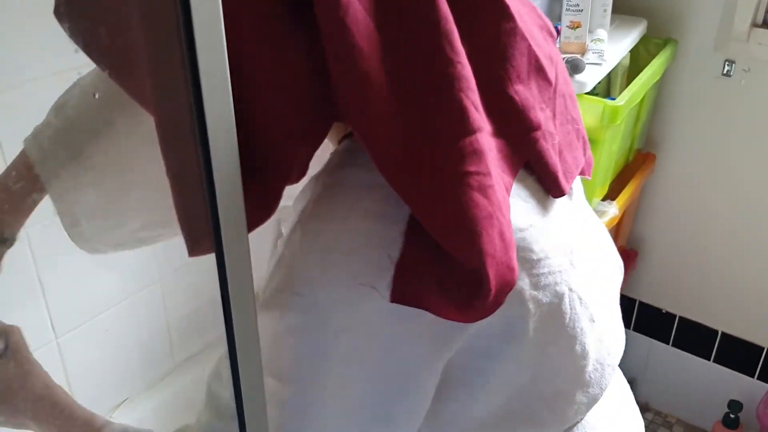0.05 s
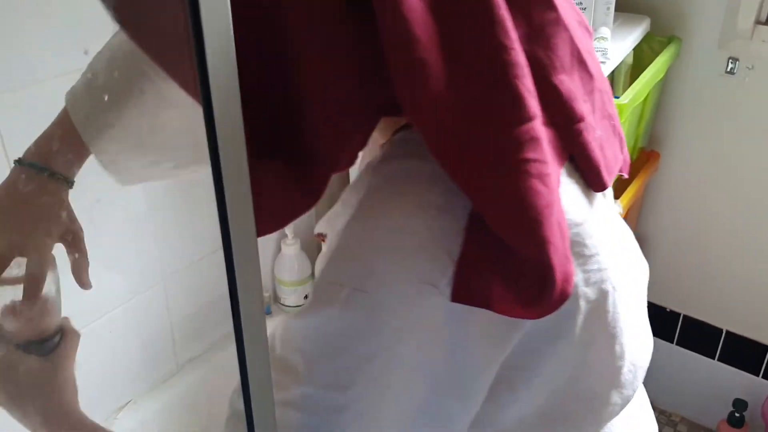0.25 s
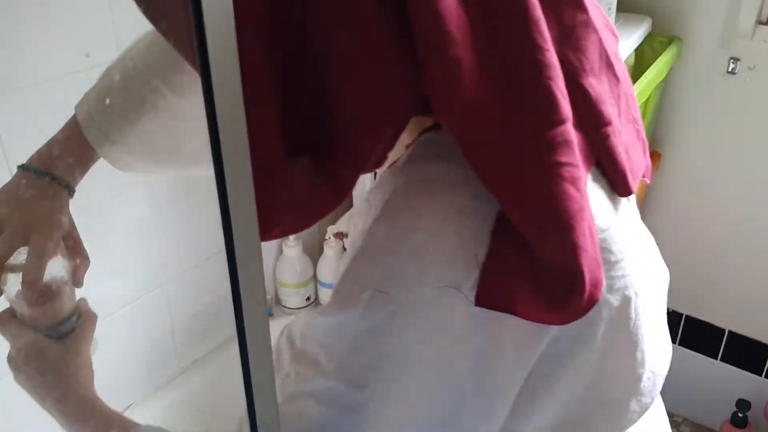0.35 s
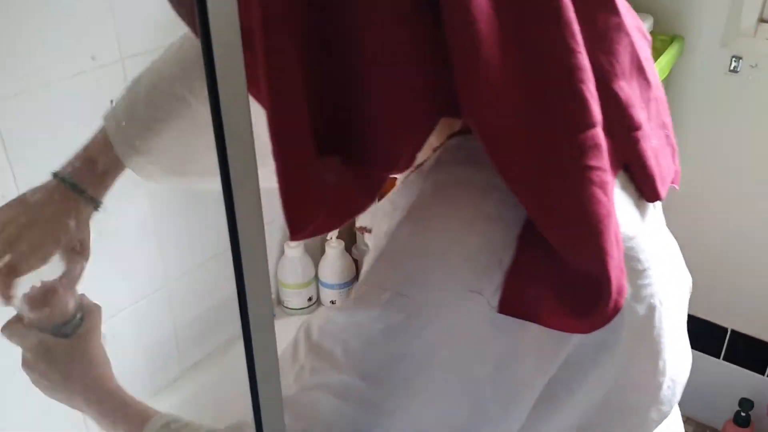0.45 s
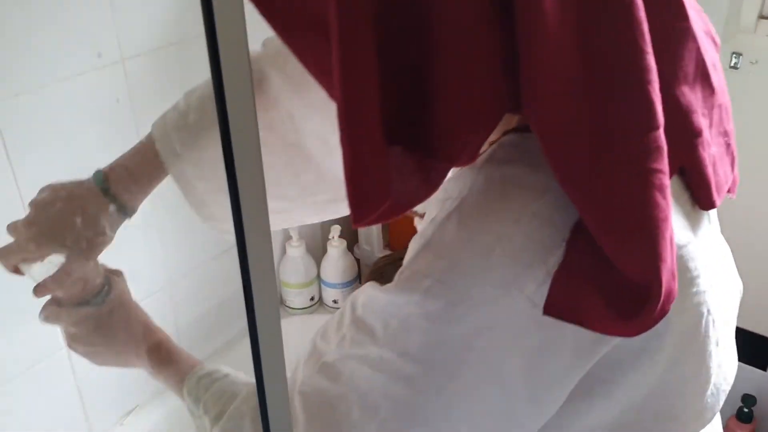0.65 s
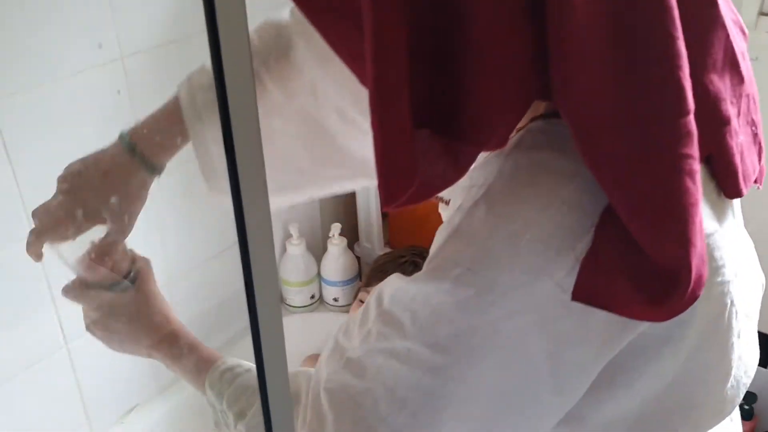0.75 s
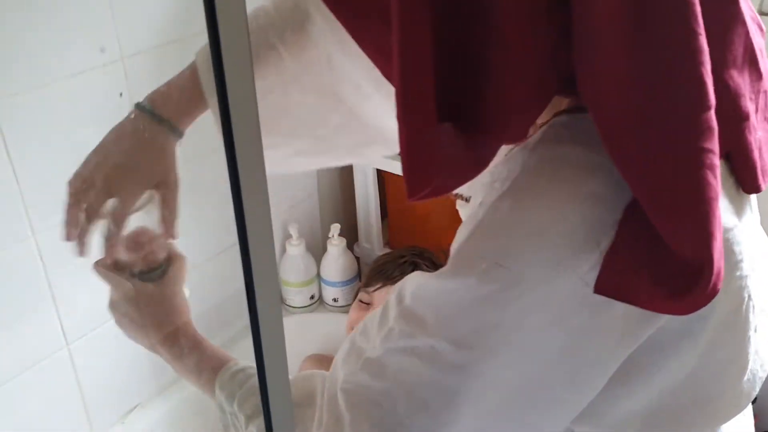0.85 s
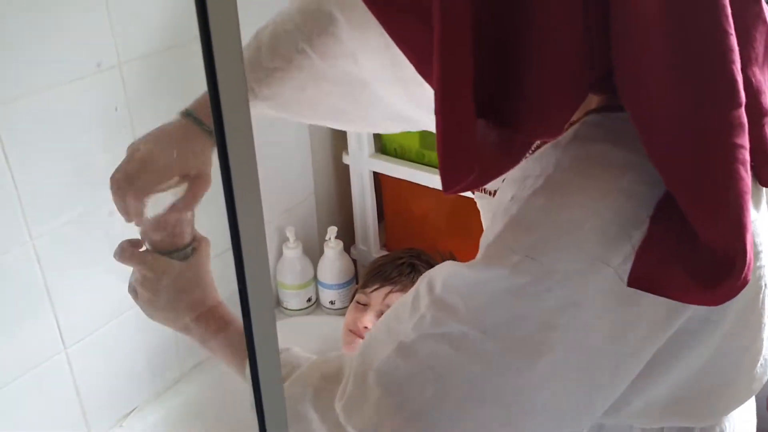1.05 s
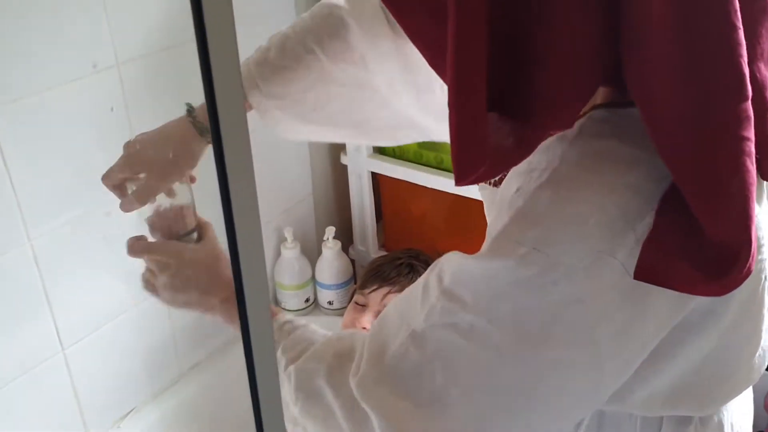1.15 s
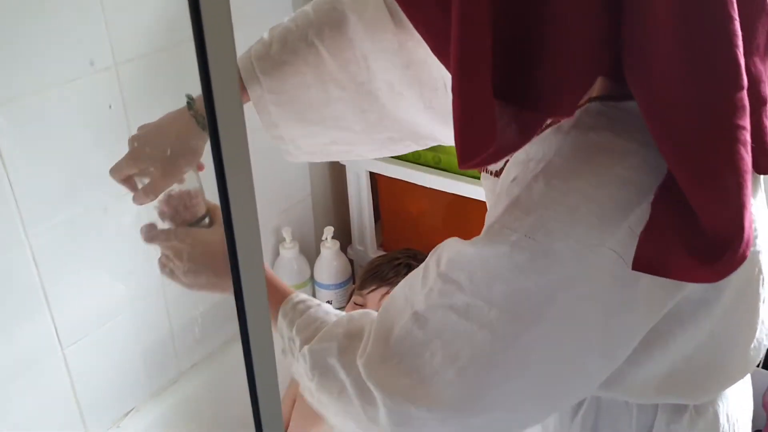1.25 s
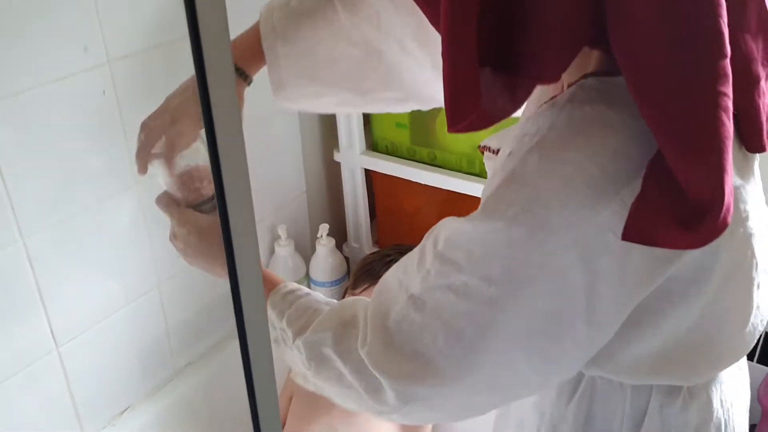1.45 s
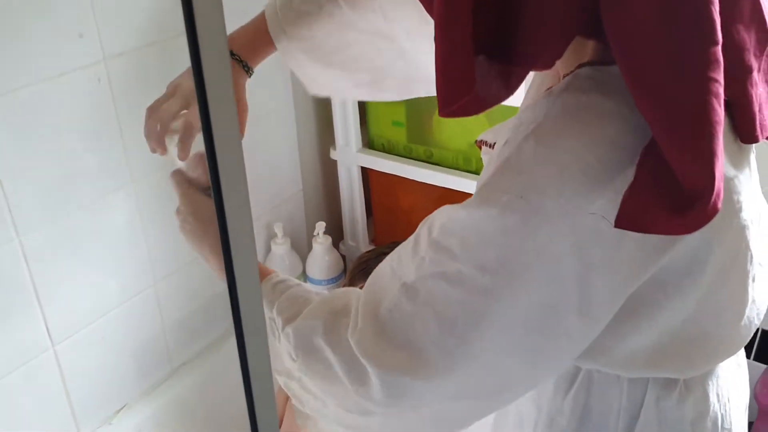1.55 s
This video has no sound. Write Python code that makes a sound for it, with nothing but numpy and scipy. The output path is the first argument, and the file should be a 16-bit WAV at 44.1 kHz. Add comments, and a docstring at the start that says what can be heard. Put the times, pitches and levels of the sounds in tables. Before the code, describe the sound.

A salt mill grinds twice with short, gritty crunches in a small tiled bathroom.

```python
"""In a small tiled bathroom, a salt mill is worked twice over a bathtub.
Each turn fractures a burst of crystals that excite the modes of the mill's body; the tiles
reflect the sound and fine salt falls. Around the turns come low handling thuds, soft bumps,
dull knocks with a low ring and one short hollow hoot of the tub. Beneath lie room tone,
a faint hiss and drone, sleeve rustle and thin whistles."""
import sys
import numpy as np
from scipy import signal
from scipy.fft import rfft, irfft
from scipy.io import wavfile
from scipy.ndimage import uniform_filter1d

SR = 44100
rng = np.random.default_rng(int(sys.argv[2]) if len(sys.argv) > 2 else 0)


def store_wav(level_fs):
    """Save 16-bit WAV to argv[1]."""
    pcm = np.round(np.clip(np.atleast_2d(level_fs), -1, 1) * 32767)
    wavfile.write(sys.argv[1], SR, pcm.T.astype(np.int16))


N = 70560
TIME, FREQS = np.arange(N) / SR, np.fft.rfftfreq(N, 1 / SR)


def amp(db):
    """Decibels to amplitude ratio."""
    return 10 ** (np.asarray(db) / 20)


def unit(x):
    """Normalisation to rms 1."""
    return x / np.sqrt(np.mean(x ** 2) + 1e-20)


def read(points, hz):
    """Interpolation on a log-frequency axis."""
    f, value = np.transpose(points)
    return np.interp(np.log(hz + 1), np.log(f + 1), value)


def level(points):
    """Amplitude envelope, silent outside its points unless they lie at the scene's ends."""
    s, db = np.transpose(points)
    before = db[0] if s[0] < .05 else -200
    after = db[-1] if s[-1] > 1.55 else -200
    return amp(np.interp(TIME, s, db, left=before, right=after))


def swell(rows):
    """Envelope of summed Gaussian pulses."""
    return sum(amp(db) * np.exp(-.5 * ((TIME - s) / width) ** 2) for s, width, db in rows)


def convolve(x, taps):
    """Linear filtering, one channel per row of taps."""
    return signal.fftconvolve(np.atleast_2d(x), np.atleast_2d(taps), axes=1)[:, :N]


def impulse(spectrum, tilt_db=0, size=4096):
    """Minimum-phase pulse of energy 1, its spectrum tilted per octave."""
    hz = abs(np.fft.fftfreq(size, 1 / SR))
    log_gain = np.log(amp(read(spectrum, hz) + tilt_db * np.log2(np.maximum(hz, 100))))
    taps = np.fft.ifft(np.exp(np.conj(signal.hilbert(log_gain)))).real
    return taps / np.linalg.norm(taps)


# likeness of left and right (frequency [Hz], correlation [0-1])
COHERENCE = [(60, 0.81), (250, 0.92), (500, 0.4), (900, 0), (15000, 0.03)]
def diffuse():
    """Diffuse field: white noise, coherent between channels only at long wavelengths."""
    a, b = rfft(rng.standard_normal((2, N)))
    same = np.clip(read(COHERENCE, FREQS), -1, 1)
    return irfft(np.array([a, same * a + np.sqrt(1 - same ** 2) * b]), N)


def noise(spectrum):
    """Spectral shaping of diffuse noise, at rms 1."""
    return unit(irfft(rfft(diffuse()) * amp(read(spectrum, FREQS)), N))


# ambient spectrum (frequency [Hz], relative density [dB])
AMBIENT_SPECTRUM = [(20, -20), (55, -4.5), (100, -3), (160, -4.5), (380, -16.5), (600, -19.5), (1500, -28),
                    (5000, -22), (8000, -28), (15000, -36.5)]
def room_tone():
    """Stationary noise, strongest in the bass."""
    return amp(-69.5) * noise(AMBIENT_SPECTRUM)


# hiss spectrum (frequency [Hz], relative density [dB])
HISS_SPECTRUM = [(300, -13), (900, -10), (2800, 0.5), (4200, -5), (6300, -3), (7500, -20.5), (9900, -13.5),
                 (13000, -24), (15500, -16)]
# hiss envelope (time [s], level [dB])
HISS_ENVELOPE = [(0, -59.5), (.1, -71), (.21, -84.5), (.28, -68.5), (.37, -92), (.68, -69), (.8, -72.5),
                 (.92, -86.5), (.965, -102), (1.01, -99.5), (1.33, -68), (1.46, -69), (1.6, -64.5)]
def hiss():
    """Broadband noise under slow amplitude modulation."""
    return level(HISS_ENVELOPE) * noise(HISS_SPECTRUM)


# drone spectrum (frequency [Hz], relative density [dB])
DRONE_SPECTRUM = [(250, -45.5), (345, -3), (410, 3), (470, -9), (600, -17.5), (2000, -68.5)]
# drone envelope (time [s], level [dB])
DRONE_ENVELOPE = [(0, -61), (.2, -72.5), (.27, -62), (.38, -89), (.6, -68.5), (.77, -71), (.95, -105.5),
                  (1.1, -86.5), (1.27, -67), (1.42, -83.5), (1.6, -86)]
def drone():
    """Narrowband noise gives a faint pitch near 400 Hz that comes and goes."""
    return level(DRONE_ENVELOPE) * noise(DRONE_SPECTRUM)


# cloth spectrum (frequency [Hz], relative density [dB])
SLEEVE_SPECTRUM = [(2000, 17), (6000, 4), (9500, 14), (12500, 8), (15500, -50)]
# sleeve movement (time [s], level [dB])
SLEEVE_ENVELOPE = [(0, -86), (.1, -85), (.2, -96), (.29, -69), (.38, -93), (.925, -100), (.945, -82),
                   (1.02, -91), (1.3, -75), (1.45, -70), (1.6, -73.5)]
def sleeve_rustle():
    """Friction noise of moving cloth."""
    return level(SLEEVE_ENVELOPE) * noise(SLEEVE_SPECTRUM)


# low, dull handling thuds (onset [s], hold [s], t60 [s], frequency [Hz], level [dB])
HANDLING_THUDS = [(0.227, 0.087, 0.1, 56.8, -41.5), (0.316, 0.23, 0.28, 32.8, -57),
                  (0.321, 0.032, 0.63, 84.2, -57), (0.639, .07, 0.34, 58.5, -66),
                  (0.991, 0.08, 0.14, 69.7, -56.5), (1.118, 0.087, 0.27, 97.8, -63.5)]
def thuds(rise_s=0.013, wander_depth=0.12):
    """Damped oscillation: handling thuds of wavering low pitch rise, hold and decay."""
    out = np.zeros(N)
    for s, hold, t60, hz, db in HANDLING_THUDS:
        t = np.maximum(TIME - s, 0)
        wander = unit(uniform_filter1d(rng.standard_normal(N), size=400))
        cycles = np.cumsum(hz * (1 + wander_depth * wander) * (t > 0)) / SR
        envelope = np.minimum(t / rise_s, 1) * amp(db - 60 * np.maximum(t - hold, 0) / t60)
        out += np.sqrt(2) * np.sin(2 * np.pi * cycles) * envelope
    return out * amp([[1], [-1]])  # slightly to the left


# modes of the tub (frequency [Hz], relative energy [dB], t60 [s])
TUB_RESONANCES = [(59.5, 13.5, 0.36), (146.6, -3, 0.22), (193.3, 0.5, 0.17), (228, -11, 0.39),
                  (290, -19, 0.51), (310, 7.5, 0.17), (386.2, 4.5, 0.82), (413, 8.5, 0.25)]
def tub_response():
    """Modal superposition: damped sines form an impulse response of energy 1."""
    t = np.arange(SR // 2) / SR
    out = sum(amp(db - 60 * t / t60) / np.sqrt(t60) * np.sin(2 * np.pi * (hz * t + rng.random()))
              for hz, db, t60 in TUB_RESONANCES)
    return out / np.linalg.norm(out)


# three handling bumps, then knocks (time [s], relative level [dB], tilt [dB/octave])
BUMPS_AND_KNOCKS = [(.238, -16.5, -6), (.261, -17, -4), (.283, -25, 1), (.628, -7.5, -1), (.641, -14.5, 3),
                    (.657, -13.5, -0.5), (.741, -20.5, 2.5), (.775, -27.5, -5), (0.864, -24, -7)]
# spectrum of an impact (frequency [Hz], relative density [dB])
IMPACT_SPECTRUM = [(25, -7), (60, 0), (150, 0), (400, -0.5), (560, -12.5), (1100, -9.5), (1600, -17),
                   (3000, -28), (8000, -67), (15000, -70)]
def bumps_and_knocks(push_cutoff_hz=405):
    """Impact excitation: soft handling bumps, then dull knocks, each leaving a low ring."""
    impacts = np.zeros(N)
    for s, db, tilt_db in BUMPS_AND_KNOCKS:
        pulse, at = amp(db) * impulse(IMPACT_SPECTRUM, tilt_db), round(s * SR)
        impacts[at:at + len(pulse)] += pulse
    push = signal.sosfilt(signal.butter(2, push_cutoff_hz, fs=SR, output="sos"), impacts)
    ring = np.std(impacts) * unit(convolve(impacts, tub_response()))
    reflected = amp(-3) * early_echoes(impacts) + amp(0.5) * reverberation(impacts)
    return amp(-7) * (amp(-4) * push + amp(-6.5) * ring + reflected)


def early_echoes(x, decay_s=0.0029):
    """Early reflections: a quick cluster off the nearest walls."""
    t = np.arange(SR // 20) / SR
    taps = diffuse()[:, :len(t)] * np.exp(-t / decay_s)
    return convolve(x, taps / np.linalg.norm(taps, axis=1, keepdims=True))


# decay of the tiled room (frequency [Hz], t60 [s])
REVERB_TIMES = [(100, 0.32), (400, 0.33), (1200, 0.28), (3000, 0.24), (8000, 0.31), (15000, 0.096)]
def reverberation(x, build_s=0.0013):
    """Dense reflections off the tiles; absorption damps each band at its own rate."""
    hz, t, bands = signal.stft(diffuse()[:, :SR // 2], SR, nperseg=256)
    decay = amp(-60 * t / read(REVERB_TIMES, hz)[:, None])
    tail = signal.istft(bands * decay, SR, nperseg=256)[1]
    tail *= np.minimum(np.arange(tail.shape[1]) / SR / build_s, 1)
    return convolve(x, tail / np.linalg.norm(tail[0]))


# spectrum of the handled mill (frequency [Hz], relative density [dB])
GRUMBLE_SPECTRUM = [(60, 4), (150, -0.5), (350, 1.5), (520, -4.5), (580, -10.5), (760, -4), (1100, -14),
                    (2000, -18.5), (5000, -44.5)]
# grips of the hands (centre [s], width [s], level [dB])
GRIPS = [(.275, 0.014, -59), (.425, 0.017, -67.5), (.515, 0.024, -53), (1.16, 0.037, -56),
         (1.28, 0.049, -66)]
def grumble():
    """Structure-borne noise: a dull grumble as the hands grip and turn the mill."""
    return noise(GRUMBLE_SPECTRUM) * swell(GRIPS)


# whistle resonances (frequency [Hz], relative density [dB])
WHISTLE_SPECTRUM = [(6000, -42), (9300, -9), (9850, 3.5), (10500, -38), (13300, -18), (13850, -8),
                    (14350, -31), (16000, -45)]
# whistle swells (centre [s], width [s], level [dB])
WHISTLE_SWELLS = [(.31, 0.03, -72), (.825, 0.026, -80), (.972, 0.022, -68.5), (1.56, .035, -73)]
def whistles():
    """Noise confined to sharp, high resonances is heard as thin whistles."""
    return swell(WHISTLE_SWELLS) * noise(WHISTLE_SPECTRUM)


# coarse crystals snapping (time [s], relative level [dB])
COARSE_SNAPS = [(.449, -19), (0.458, -14), (0.475, -28), (0.48, -11.5), (0.505, -20.5), (.510, -4),
                (0.513, -21.5), (1.091, -17), (1.109, -17), (1.119, -10), (1.155, -22)]
def fracture(effort, cracks_per_s=500, spread_db=1.5, crumble_s=0.001, powder_db=-7.5):
    """Brittle fracture: cracks and fine powder follow the hand's effort; coarse crystals snap."""
    gaps, sizes = rng.random((2, 1500))
    at = (np.cumsum(.2 + 1.6 * gaps) / cracks_per_s * SR).astype(int)
    cracks = np.zeros(N)
    cracks[at[at < N]] = amp(spread_db * np.minimum(-np.log(1 - sizes), 3))[at < N]
    crumble = signal.lfilter([1], [1, -np.exp(-1 / (crumble_s * SR))], cracks)
    grit = unit(crumble * rng.standard_normal(N)) + amp(powder_db) * rng.standard_normal(N)
    running_rms = np.sqrt(uniform_filter1d(grit ** 2, size=1100))
    drive = grit / running_rms * level(effort)
    for s, db in COARSE_SNAPS:
        if effort[0][0] < s < effort[-1][0]:
            drive[round(s * SR)] += amp(db)
    return drive


# broad resonance, per turn (start [Hz], end [Hz], bandwidth [Hz], gain [dB])
SWEEPS = [(2210, 3490, 400, 14), (2180, 3470, 440, 12)]
def climbing_resonance(drive, effort, turn):
    """Swept resonance: a band of the crunch rises in pitch through the turn."""
    start_hz, end_hz, width_hz, db = SWEEPS[turn]
    hz = np.interp(TIME, [effort[0][0], effort[-1][0]], [start_hz, end_hz])
    carrier = np.exp(2j * np.pi * np.cumsum(hz) / SR)
    pole = np.exp(-np.pi * width_hz / SR)
    baseband = signal.lfilter([(1 - pole) ** 2], [1, -2 * pole, pole * pole], drive / carrier)
    return amp(db) * 2 * (carrier * baseband).real


# modes of the mill, shifting with the grip, per turn (frequency [Hz], relative level [dB])
MILL_RESONANCES = [
    [(1152, -57), (1227, -59.5), (1572, -57), (1626, -59), (1954, -54), (2143, -55), (2406, -64),
     (2530, -48.5), (2778, -47.5), (2993, -49.5), (3230, -67), (3585, -75), (3720, -70), (3833, -70)],
    [(1077, -67), (1599, -65.5), (1825, -58), (2164, -63), (2600, -59), (2681, -68), (2826, -53),
     (2998, -55), (3079, -57), (3155, -58), (3273, -65.5), (3623, -63.5)],
]
# ring of the mill, per turn (gain [dB], t60 [s])
MILL_DECAYS = [(-2, 0.1), (-4, 0.21)]
def mill_ring(effort, turn, wander_hz=5):
    """Energy storage: the mill's wavering modes build up with the effort and decay exponentially."""
    ring_db, t60 = MILL_DECAYS[turn]
    retained = np.exp(-2 * np.log(1000) / (t60 * SR))
    energy = signal.lfilter([1 - retained], [1, -retained], level(effort) ** 2)
    out = 0
    for hz, db in MILL_RESONANCES[turn]:
        waver = np.interp(np.arange(N), np.linspace(0, N, num=120), rng.standard_normal(120))
        cycles = np.cumsum(hz + wander_hz * waver) / SR + rng.random()
        right_shift = rng.choice([-1, 1]) * rng.uniform(.15, .35)
        out = out + amp(db) * np.sin(2 * np.pi * np.array([cycles, cycles + right_shift]))
    return amp(ring_db) * np.sqrt(energy) * unit(out)


# effort of the hand, per turn (time [s], level [dB])
EFFORTS = [
    [(.392, -73), (.412, -47.5), (.448, -39), (.467, -37.5), (.484, -34), (.513, -37.5), (.553, -44),
     (.575, -70), (.615, -53.5), (.64, -69)],
    [(1.018, -74), (1.036, -47), (1.08, -40), (1.108, -34.5), (1.15, -39), (1.168, -47), (1.19, -73),
     (1.225, -64), (1.25, -58.5)],
]
# spectrum of crushed salt, per turn (frequency [Hz], relative density [dB])
CRUSH_SPECTRA = [
    [(300, -33), (650, -23), (900, -12.5), (1300, -5.5), (1950, -3), (2900, 0), (3600, -6.5), (5200, -16),
     (7500, -27), (9000, -23), (12500, -30), (15500, -39)],
    [(300, -51), (700, -30), (1050, -12.5), (1400, -8), (2100, -2.5), (2800, 1), (3700, -4.5),
     (5200, -14.5), (7500, -26), (9000, -22.5), (12500, -26), (15500, -40)],
]
# where the mill is held, per turn (left minus right [dB])
TURN_BALANCE = [0, -0.5]
def grind(turn):
    """Source and filter: one turn's fractures, heard directly and by reflection, with the mill's ring."""
    effort, side_db = EFFORTS[turn], TURN_BALANCE[turn]
    drive = fracture(effort)
    crush = convolve(drive, impulse(CRUSH_SPECTRA[turn]))
    heard = amp(-12.5) * crush + amp(-3.5) * early_echoes(crush) + amp(-3) * reverberation(crush)
    heard += early_echoes(climbing_resonance(drive, effort, turn))
    heard += mill_ring(effort, turn)
    return amp(-1) * heard * amp([[side_db / 2], [-side_db / 2]])


# spectrum of falling salt (frequency [Hz], relative density [dB])
SALT_SPECTRUM = [(1500, -21.5), (3500, 7), (6000, 7.5), (7500, -1.5), (9500, 2), (13000, 0), (15500, -9.5)]
# flow of salt, per turn (time [s], level [dB])
SALT_FLOWS = [
    [(.44, -56.5), (.52, -51), (.6, -56.5), (.64, -67.5), (.72, -75)],
    [(1.025, -70), (1.06, -54.5), (1.14, -49.5), (1.18, -58), (1.26, -80)],
]
def falling_salt():
    """Incoherent summation: fine falling grains merge into bright noise."""
    return noise(SALT_SPECTRUM) * sum(level(flow) for flow in SALT_FLOWS)


# balance of the mill (frequency [Hz], left minus right [dB])
MILL_BALANCE = [(300, -1.5), (1100, -1.5), (2000, -2), (3300, -1.5), (4200, 4.5), (5500, 9.5), (6700, -3),
                (7500, 0.5), (9000, -4.5), (10200, 4.5), (11900, -9), (13300, 6), (14300, -2), (15000, 11)]
def mill():
    """A level difference between channels, varying with frequency, places the mill's sounds."""
    sound = falling_salt() + grumble() + grind(turn=0) + grind(turn=1)
    side_db = read(MILL_BALANCE, FREQS)
    return irfft(rfft(sound) * amp([side_db / 2, -side_db / 2]), N)


# hollow tones of the tub (frequency [Hz], relative level [dB])
HOOT_PARTIALS = [(277, 12.5), (306, 9.5), (383, -3)]
# their swell (time [s], level [dB])
HOOT_ENVELOPE = [(1.1, -96), (1.13, -59), (1.16, -44), (1.185, -48), (1.21, -63.5), (1.3, -76), (1.4, -102)]
def hoot():
    """Beating: close tones, in phase at the peak of the swell, interfere as they fade."""
    peak_s = max(HOOT_ENVELOPE, key=lambda point: point[1])[0]
    tones = sum(amp(db) * np.cos(2 * np.pi * hz * (TIME - peak_s)) for hz, db in HOOT_PARTIALS)
    return level(HOOT_ENVELOPE) * unit(tones)


def scene():
    """Superposition of all sources in the bathroom."""
    events = mill() + bumps_and_knocks() + thuds() + hoot()
    return events + room_tone() + hiss() + drone() + sleeve_rustle() + whistles()


def record(dry):
    """Band limiting by a linear-phase low-pass filter."""
    taps = signal.firwin(511, cutoff=15700, window=("kaiser", 9), fs=SR)
    return signal.oaconvolve(dry, taps[None], "same")


dry = scene()
out = record(dry)
store_wav(out)
```